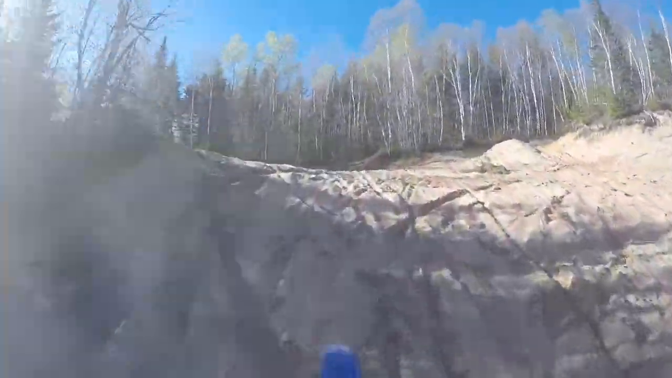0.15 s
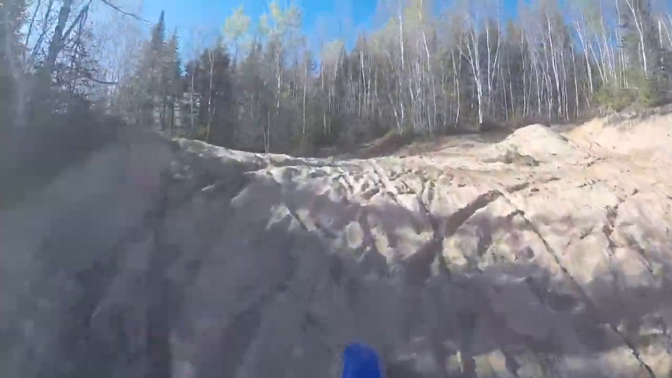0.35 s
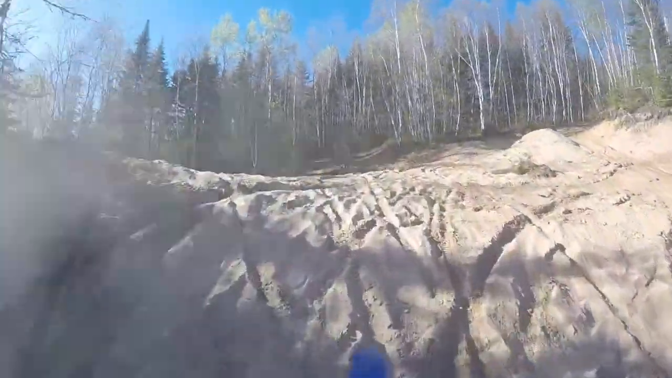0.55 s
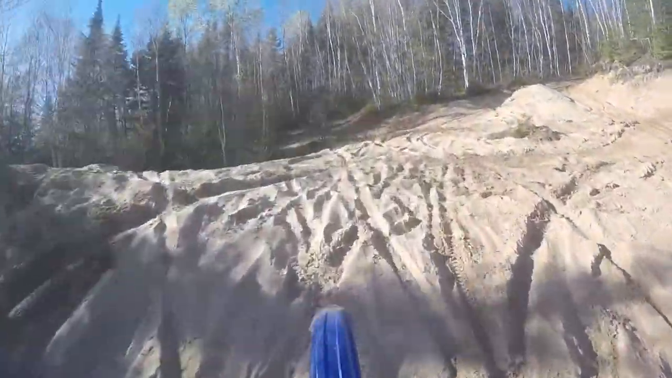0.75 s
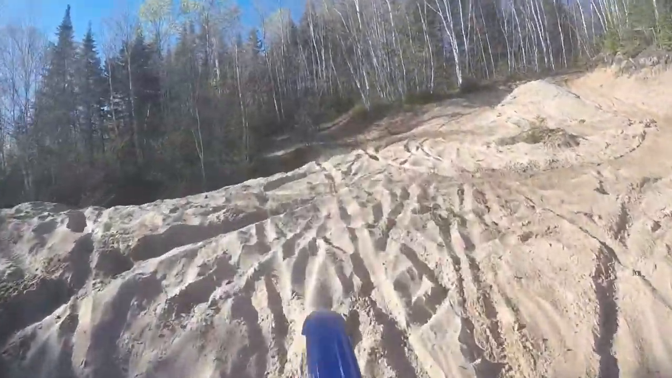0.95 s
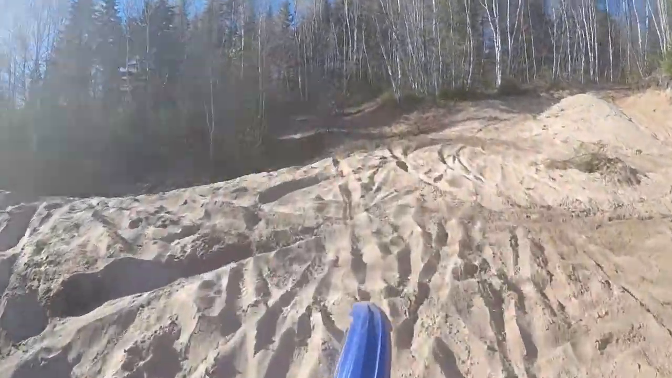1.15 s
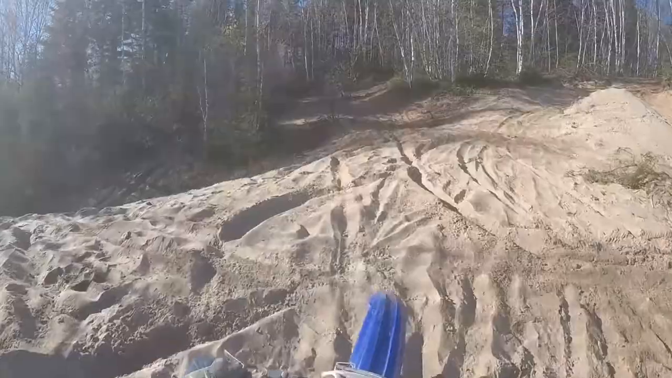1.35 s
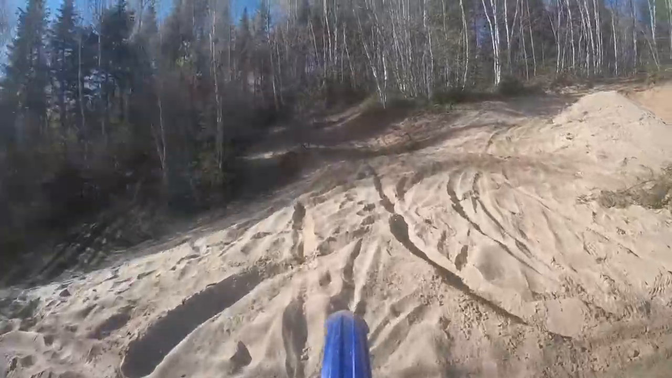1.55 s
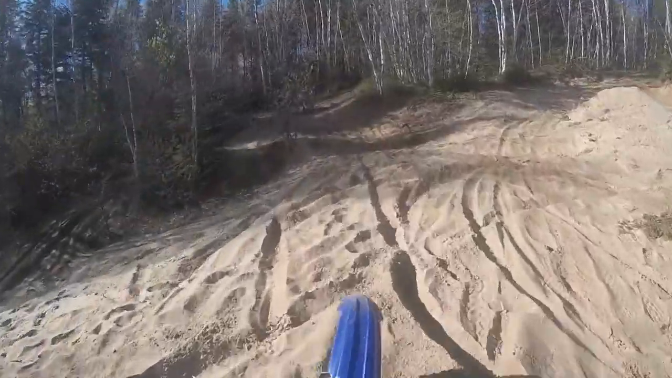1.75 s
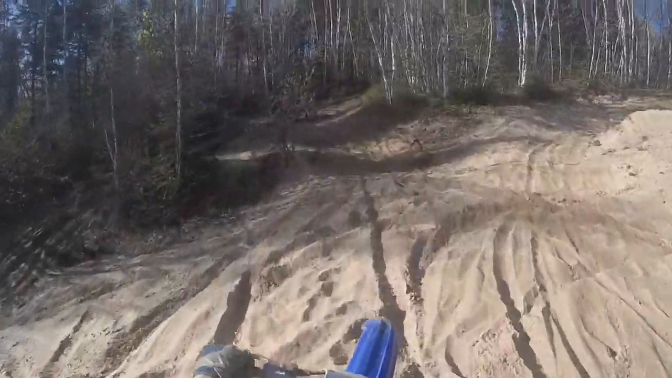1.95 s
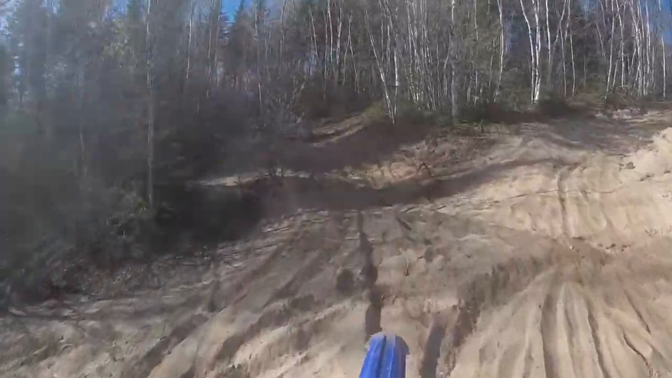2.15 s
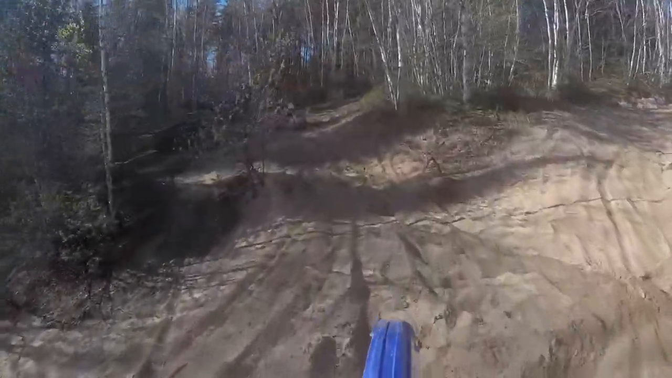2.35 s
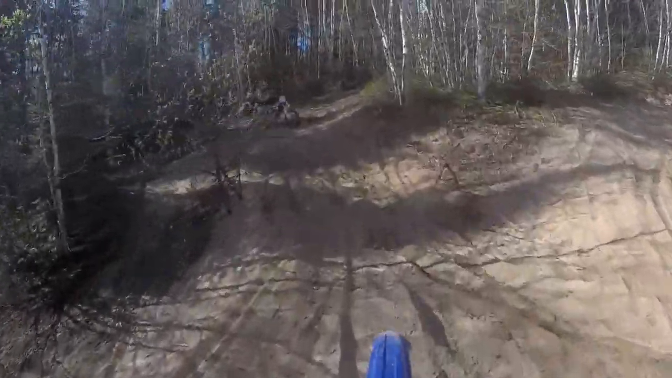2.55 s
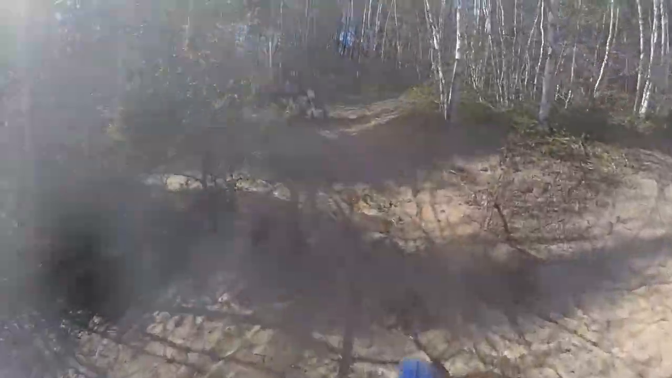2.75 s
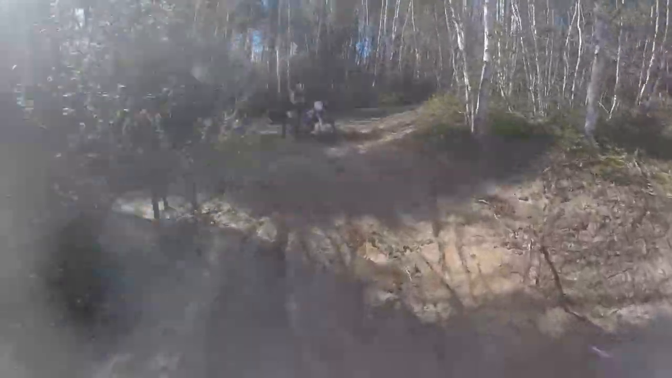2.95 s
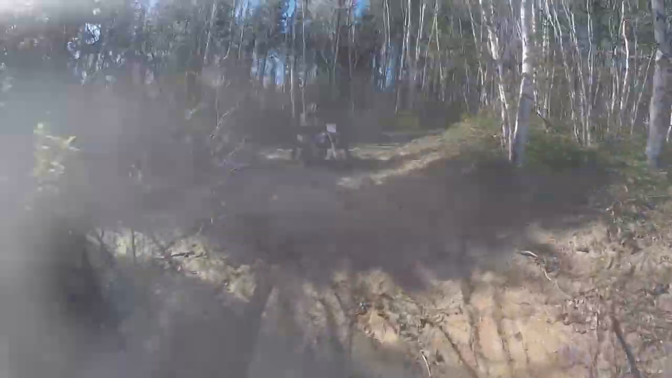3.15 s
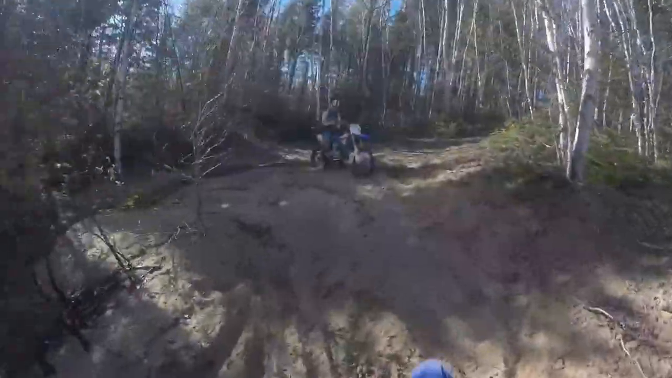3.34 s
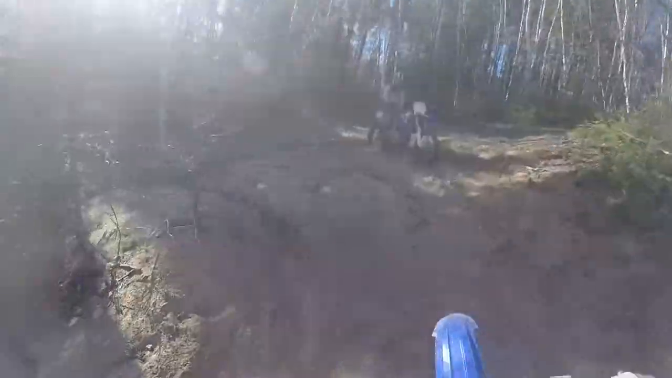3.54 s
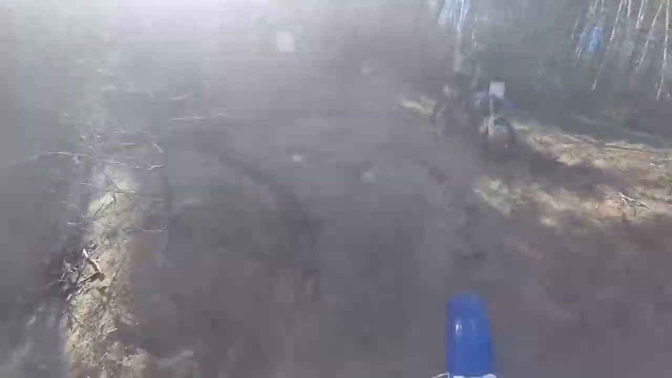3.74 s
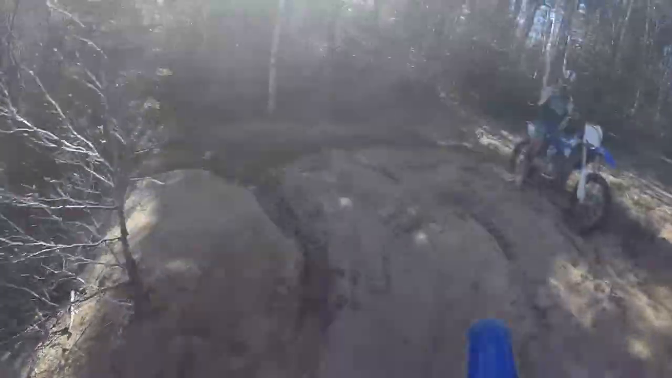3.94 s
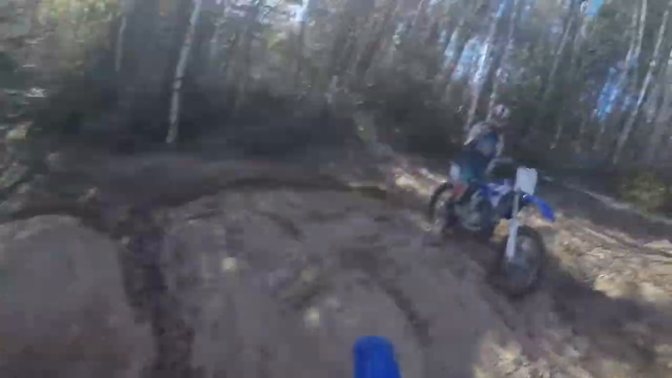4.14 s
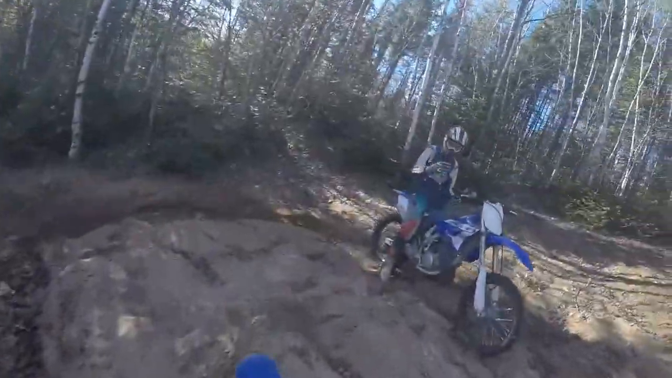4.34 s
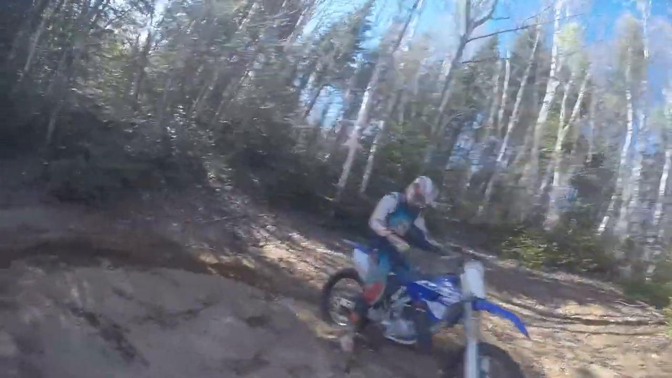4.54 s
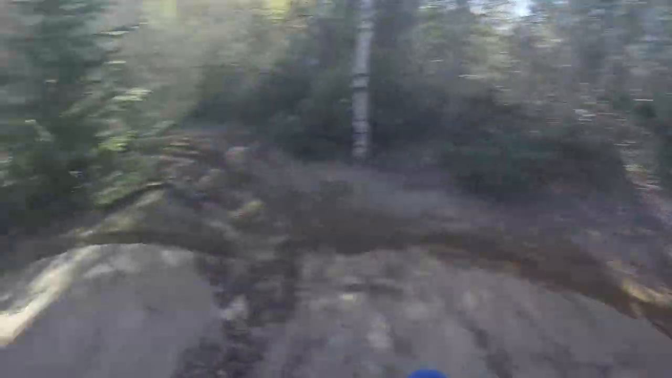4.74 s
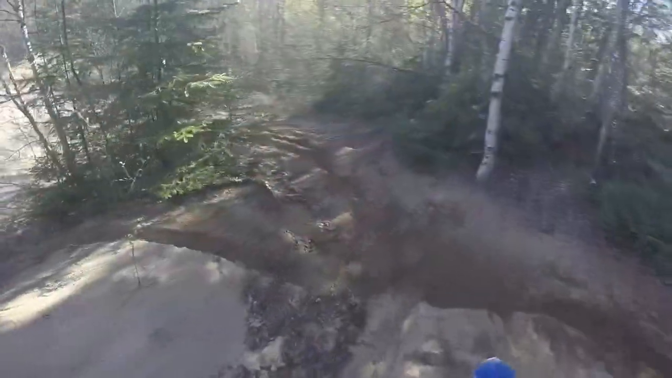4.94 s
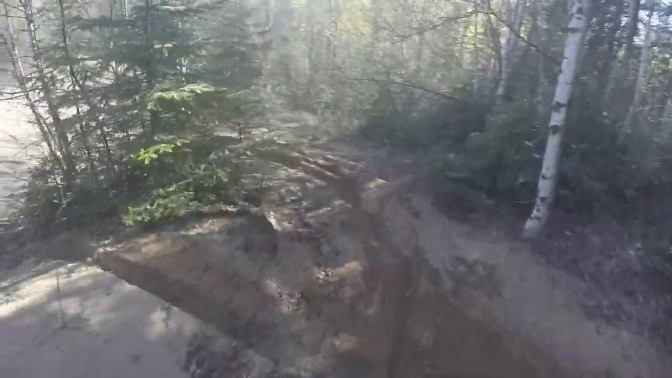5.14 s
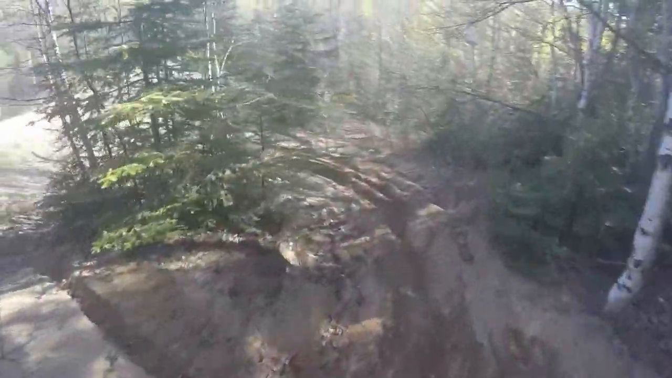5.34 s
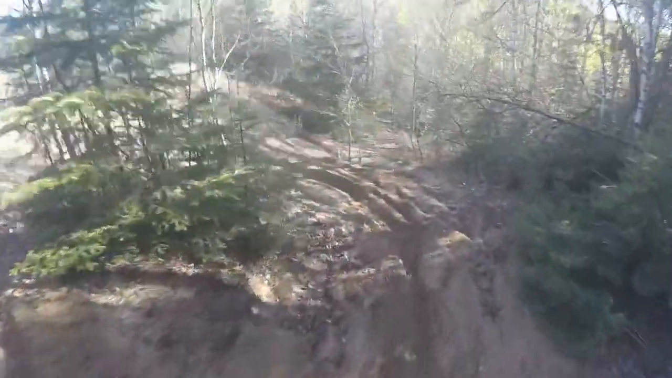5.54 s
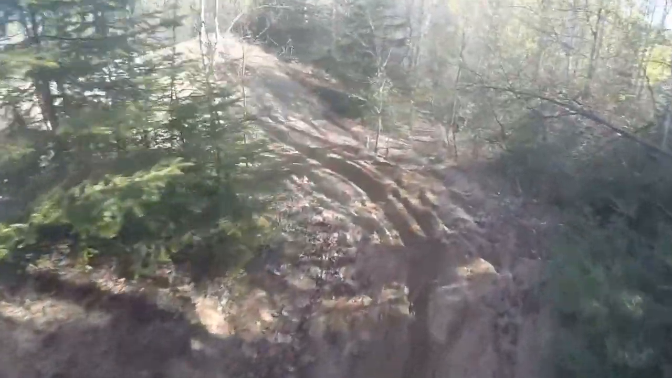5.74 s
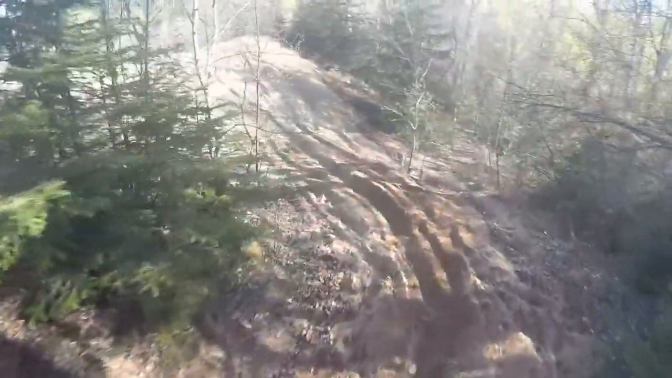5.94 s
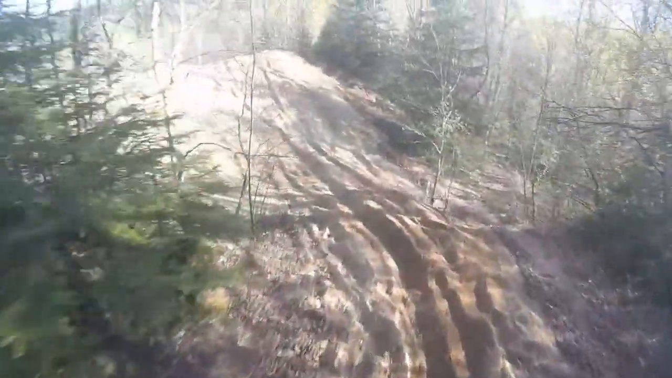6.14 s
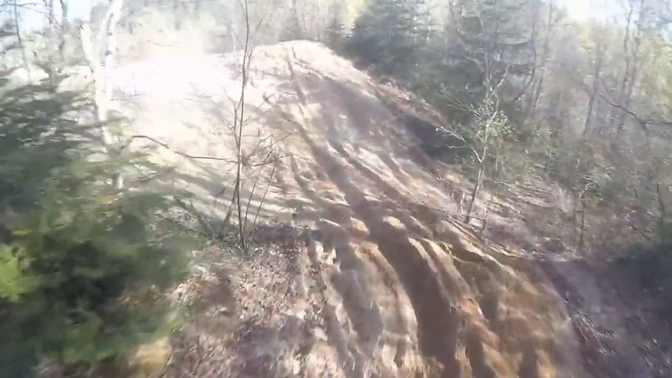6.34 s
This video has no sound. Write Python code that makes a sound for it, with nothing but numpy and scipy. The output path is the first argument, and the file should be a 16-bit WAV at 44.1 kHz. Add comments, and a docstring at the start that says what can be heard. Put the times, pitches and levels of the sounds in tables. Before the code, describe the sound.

Outdoors with the microphone on the bike, a two-stroke engine rips through five back-to-back throttle bursts, each rising in pitch and cutting off briefly. It then falls to a rough, clattering near-idle with small blips, lone pops and wavering gear whine. Sharp chassis knocks and suspension thuds land around the middle, with low wind flutter throughout, and the throttle opens again at the very end.

```python
"""Dirt bike on a sandy hill, from the rider's seat

Open air, microphone on the bike: a two-stroke climbs in five bursts of throttle, then rolls over bumps near idle.
Exhaust pulses and gas noise, once a turn, ring pipe and casing; lone hard firings are noise bursts through them.
A wavering sine at the tooth rate is the gear whine; short noise bursts are chassis knocks and suspension thuds.
Shaped noise gives the buffeting air, the tyre rumble and a faint hiss."""
import sys
import numpy as np
from scipy import signal
from scipy.fft import rfft, irfft, next_fast_len
from scipy.io import wavfile
from scipy.ndimage import uniform_filter1d, map_coordinates

SR = 44100
rng = np.random.default_rng(int(sys.argv[2]) if len(sys.argv) > 2 else 0)


def persist_wave(psi):
    """Save psi, clipped to +-1, as 16-bit WAV."""
    counts = np.round(np.clip(psi, -1, 1) * 32767).astype(np.int16)
    wavfile.write(sys.argv[1], SR, np.atleast_2d(counts).T)


N = 286209
TIME = np.arange(N) / SR
IDLE_HZ = 47.6   # crank turns per second at idle


def from_db(db):
    """Decibels to gain."""
    return 10 ** (np.asarray(db) / 20)


def even(x, size):
    """Hold the running rms near one, over windows of size samples."""
    power = uniform_filter1d(uniform_filter1d(x * x, size), size)
    return x / np.sqrt(np.maximum(power, 1e-12))


def drift(rate):
    """Slow chance, about one in spread: straight lines between rate random values per second."""
    steps = rng.standard_normal(8192)
    return np.interp(TIME * rate, np.arange(len(steps)), steps)


def body(x, spectrum, modes=()):
    """Ring x through a causal body of unit power gain, given its spectrum and its sharp modes."""
    size = 2 * next_fast_len(N // 2 + SR // 4)
    hz = np.maximum(np.arange(size // 2 + 1) * SR / size, 1)
    points = np.array(spectrum)
    db = np.interp(np.log(hz), np.log(points[:, 0]), points[:, 1])
    # beyond both ends of the table the response falls away
    beyond = np.maximum(hz / points[-1, 0], 1) * np.maximum(points[0, 0] / hz, 1)
    db = db - 20 * np.log(beyond)
    for centre, width, lift in modes:
        db = db + lift / (1 + (2 * (hz - centre) / width) ** 2)
    gain = from_db(db) / np.sqrt(np.mean(from_db(db) ** 2))
    cepstrum = irfft(np.log(gain))[:size // 2]
    cepstrum[1:] *= 2   # minimum phase: nothing sounds before its cause
    response = np.exp(rfft(cepstrum, size))
    return irfft(rfft(x, size) * response)[:N]


def bursts(times, levels_db, rise, decay):
    """Envelopes that swell quickly and die away, one for each event; rise and decay in seconds."""
    out = np.zeros(N)
    for s, db in zip(times, levels_db):
        age = np.maximum(TIME - s, 0)
        out += from_db(db) * (1 - np.exp(-age / rise)) * np.exp(-np.minimum(age / decay, 20))
    return out


# crankshaft speed through each of the five pulls up the hill: [t/s, f/Hz in turns per second]
CLIMB_TURNS = [
    [(0.0, 91), (0.054, 92.3), (0.108, 97.8), (0.238, 101.5), (0.374, 133.5), (0.43, 136), (0.46, 139),
     (0.498, 120), (0.52, 108)],
    [(0.54, 106), (0.594, 111), (0.668, 114.6), (0.714, 121), (0.8, 130), (0.834, 130), (0.878, 114),
     (0.932, 97.5), (0.96, 102)],
    [(0.98, 90.4), (1.034, 89.0), (1.086, 90), (1.266, 109.4), (1.354, 129), (1.392, 121), (1.47, 102),
     (1.492, 92), (1.51, 96)],
    [(1.53, 89.8), (1.604, 94), (1.698, 102), (1.766, 102), (1.828, 111.4), (1.914, 119.5), (1.94, 110),
     (1.996, 93.4), (2.01, 94)],
    [(2.03, 87), (2.066, 90.2), (2.15, 100.5), (2.188, 104.6), (2.232, 108), (2.29, 124.4), (2.326, 119),
     (2.386, 116), (2.44, 102)],
]
# crankshaft speed while rolling over the bumps: [t/s, f/Hz in turns per second]
ROLL_TURNS = [(2.5, 84.4), (2.65, 51), (3.04, 45.2), (3.21, 57.5), (3.42, 60.5), (3.55, 50.7), (3.78, 43.3),
              (3.88, 63.4), (3.99, 51), (4.07, 48), (4.2, 45), (4.44, 47.7), (4.56, 54), (4.69, 52),
              (4.81, 46.7), (4.94, 50.3), (5.1, 47.4), (5.52, 45), (5.66, 51.5), (5.73, 50.7), (5.92, 48),
              (6.2, 43.4), (6.39, 49.5), (6.49, 70)]


def crank_speed():
    """Revolutions per second at every sample, in straight lines between the table's points."""
    s, turns_per_s = np.vstack([*CLIMB_TURNS, ROLL_TURNS]).T
    lead_s = .006   # the crank runs ahead of the ringing that it causes
    return np.interp(TIME + lead_s, s, turns_per_s)


def twist(opens, shuts, rise_s, release_s):
    """One twist of the throttle: attack, hold and a round-shouldered release, from 0 to 1."""
    rise = 1 - np.exp(-np.maximum(TIME - opens, 0) / rise_s)
    return rise / (1 + (np.maximum(TIME - shuts, 0) / release_s) ** 3)


# twists of the throttle: [opens t/s, shuts t/s, relative drive level/dB, base rise time/s,
#                          relative gear whine level/dB]
TWISTS = [(-0.05, .425, 0, .003, -8), (.528, .848, .7, .003, -4), (.968, 1.375, 0, .003, -4),
          (1.512, 1.905, .2, .003, -6), (2.015, 2.382, -.2, .005, 4), (3.05, 3.44, -9.3, .08, 3),
          (3.803, 3.905, -10, .025, 2), (4.09, 4.2, -18.5, .025, -8), (4.56, 4.96, -16, .06, 4.5),
          (5.56, 5.7, -26, .04, -15), (6.3, 6.44, -14, .06, -8), (6.41, 6.5, 2.5, .15, -10)]


def drive(attack_s, release_s, early_s=0):
    """How hard the engine is driven: all twists together; a gentle twist also ends gently."""
    return sum(from_db(db) * twist(opens, shuts - early_s, rise_s + attack_s, release_s + .4 * rise_s)
               for opens, shuts, db, rise_s, _ in TWISTS)


def loudness(law, speed, revs):
    """A voice's gain: a part that follows the throttle, joined in power to one that follows speed alone."""
    full_db, revs_db, power, attack_s, release_s, early_s, idle_db, octave_db = law
    fired = from_db(full_db + revs_db * revs) * drive(attack_s, release_s, early_s) ** power
    shut = from_db(idle_db + octave_db * np.log2(speed / IDLE_HZ))
    return np.hypot(fired, shut)


def blowdown(speed, uneven_db, jitter_s, rough, jet_turns):
    """Once a turn the exhaust port opens: a pressure pulse, then a fading jet of turbulent gas."""
    turns = np.cumsum(speed) / SR
    opens = np.interp(np.arange(int(turns[-1]) + 1), turns, np.arange(N))
    chance = rng.standard_normal((1024, 2))[:len(opens)]
    strength = from_db(uneven_db * chance[:, 0])
    at = np.clip(opens + jitter_s * SR * chance[:, 1], 0, N - 1).astype(int)
    pulses = np.zeros(N)
    pulses[at] = strength * np.sqrt(SR / speed[at])   # about equal power at any speed
    jet = np.exp(-(turns % 1) / jet_turns) * strength[turns.astype(int)]
    return pulses + rough * jet / np.sqrt(np.mean(jet ** 2)) * rng.standard_normal(N)


def scatter(x, spread_s):
    """Waves linger in the pipe's walls: each pitch arrives after its own delay, its strength unchanged."""
    size = 2 * next_fast_len(N // 2 + SR // 4)
    hz = np.arange(size // 2 + 1) * SR / size
    marks = np.linspace(0, SR / 2, num=256)
    delay = np.interp(hz, marks, spread_s * rng.exponential(1, len(marks)))
    phase = 2 * np.pi * np.cumsum(delay) * SR / size
    return irfft(rfft(x, size) * np.exp(-1j * phase))[:N]


# exhaust note at speed: [f/Hz, relative level/dB]
EXHAUST_BOOM = [(40, -90), (90, -5.5), (135, -5), (160, -11), (190, 1.5), (275, 8.5), (330, 8.5), (380, -8),
                (480, 0), (530, -3), (575, -15), (660, -9.5), (760, -27), (1100, -113.5)]
# exhaust note on the overrun: [f/Hz, relative level/dB]
EXHAUST_OVERRUN = [(50, -10), (100, -13.5), (150, -10), (200, -1), (245, 5), (300, 2.5), (365, -3.5),
                   (425, 5), (490, -3), (570, -20), (680, -35), (1100, -45)]
# expansion chamber: [f/Hz, relative level/dB]
CHAMBER = [(400, -50), (720, -25), (850, -5), (980, 3), (1140, -6), (1270, -6), (1400, 1), (1520, 3),
           (1700, -7), (2000, -17), (3000, -45)]
# engine casing near idle: [f/Hz, relative level/dB]
ENGINE_CASING = [(400, -2.5), (690, -10.5), (850, 1.5), (985, 7.5), (1130, -6), (1300, -8), (1550, 1),
                 (1850, -6), (2100, -7), (3000, -31.5)]
# thin steel of the pipe: [f/Hz, relative level/dB]
PIPE_STEEL = [(500, -11.5), (1400, 1.5), (1800, 0.5), (2120, -6), (2500, -0.5), (3100, -6.5), (3500, -9.5),
              (4400, -8.5), (5100, -18), (5600, -18.5), (6400, -8), (7700, -18), (9400, -29),
              (10600, -24.5), (15000, -39.5)]
# sharp modes of that steel: [f/Hz, width/Hz, lift/dB]
PIPE_MODES = [(2330, 91, 14.5), (2663, 41, 8), (2713, 27, -9), (2970, 75, 5), (3170, 40, 3), (3210, 32, 13),
              (3733, 76, 9), (3920, 40, 5), (4276, 33.6, 10.5), (4480, 52, 3.5), (5083, 33, 11.5),
              (6650, 107, -16), (6850, 53, 7.5), (8200, 190, 4)]
# voices of the engine, one row each: [level/dB at full drive, change/dB at high revs, power of the drive,
#   attack/s and release/s (gentle twists lengthen both), fades early by/s,
#   level/dB at idle with the throttle shut, rise/dB per octave of speed]
LOW_VOICE = (-20, 1.2, 0.73, 0.03, 0.01, 0.0544, -41.5, 10)
MIDDLE_VOICE = (-17.6, -8, 1.22, .012, .036, .008, -41.5, 12)
RASP_VOICE = (-20.5, 3.5, 1, 0.016, 0.0464, 0, -46.2, 13.5)
SIZZLE_VOICE = (-19, 2, 1.54, 0.0057, 0.0345, 0, -50.5, 13.5)
PIPE_SETS_IN_HZ, PIPE_SPAN_HZ = 62.6, 22   # the crank speeds over which the tuned pipe takes over
HIGH_REVS_HZ, HIGH_REVS_SPAN_HZ = 105.5, 23   # crank speed where the high revs begin, and their range
SIZZLE_EDGE_HZ = 4730   # the pipe's rasp lies below, its sizzle above


def engine(speed):
    """At speed the turns fire cleanly through the pipe; when slow, pulses soften and the casing clatters."""
    load = np.clip((speed - PIPE_SETS_IN_HZ) / PIPE_SPAN_HZ, 0, 1)
    loaded, idle = np.sqrt(load), np.sqrt(1 - load)
    throttle = load * np.clip(drive(attack_s=0.0095, release_s=0.074), 0, 1)
    # the gas flow roughens as the revs rise
    revs = np.clip((speed - HIGH_REVS_HZ) / HIGH_REVS_SPAN_HZ, 0, 1)
    crack_rough, shock_rough = .18 + .45 * revs, .4 + .3 * revs + 1.3 * idle
    slugs = blowdown(speed, uneven_db=.5, jitter_s=.00003, rough=.13, jet_turns=.6)
    puffs = blowdown(speed, uneven_db=.8, jitter_s=.00005, rough=.36, jet_turns=1.5)
    cracks = blowdown(speed, uneven_db=1.1, jitter_s=.00002, rough=crack_rough, jet_turns=.7)
    shocks = blowdown(speed, uneven_db=1.9, jitter_s=.000018, rough=shock_rough, jet_turns=1.4)
    clatter = blowdown(speed, uneven_db=1.5, jitter_s=.00005, rough=.5 + 1.6 * idle, jet_turns=2.5)

    boom = even(body(slugs, EXHAUST_BOOM), size=1600)
    overrun = even(body(scatter(puffs, spread_s=0.01149), EXHAUST_OVERRUN), size=2600)
    bark = even(body(scatter(cracks, spread_s=.0026), CHAMBER), size=1600)
    casing = even(body(scatter(clatter, spread_s=0.003996), ENGINE_CASING), size=2600)
    steel = even(body(scatter(shocks, spread_s=.006), PIPE_STEEL, PIPE_MODES), size=2000)
    below = signal.butter(5, SIZZLE_EDGE_HZ, "low", fs=SR, output="sos")
    above = signal.butter(5, SIZZLE_EDGE_HZ, "high", fs=SR, output="sos")
    rasp, sizzle = signal.sosfilt(below, steel), signal.sosfilt(above, steel)

    low = loaded * boom + idle * overrun
    # the chamber only barks while the throttle is open
    middle = np.sqrt(throttle) * bark + np.sqrt(1 - throttle) * casing
    voices = (low, LOW_VOICE), (middle, MIDDLE_VOICE), (rasp, RASP_VOICE), (sizzle, SIZZLE_VOICE)
    return sum(voice * loudness(law, speed, revs) for voice, law in voices)


def reflections(x):
    """Ground and rider's body echo the treble close by; the paths shift as the bike pitches, by slow chance."""
    treble = signal.sosfilt(signal.butter(2, 1900, "high", fs=SR, output="sos"), x)
    out = x
    for delay_s in (.0011, .0023, .0037):
        lag = delay_s + .00009 * drift(11)
        out = out + .33 * map_coordinates(treble, [np.arange(N) - lag * SR], order=3)
    return out


# how strongly the casing radiates the gear whine: [f/Hz, relative level/dB]
WHINE_RADIATION = [(880, -45), (975, -42), (1035, -38), (1130, -42.5), (1300, -44), (1520, -23),
                   (1750, -33), (1980, -47), (2340, -32), (2900, -34)]
GEAR_TEETH = 21
LASH_DB, LASH_DELAY_S, LASH_WIDTH_S = 4, 0.07, 0.038   # the whine swells just after the throttle shuts
WHINE_COASTING_DB = -5.5   # relative level with the throttle shut
WHINE_WOBBLE = 0.02366   # share of the pitch at idle, growing with speed


def gears(speed):
    """The crank gear's teeth mesh in a rough, wavering note: louder under drive, swelling as it lets go."""
    hz = GEAR_TEETH * speed
    mesh = from_db(WHINE_COASTING_DB)
    for opens, shuts, _, rise_s, whine_db in TWISTS:
        lash = from_db(LASH_DB) * np.exp(-((TIME - shuts - LASH_DELAY_S) / LASH_WIDTH_S) ** 2)
        mesh = mesh + from_db(whine_db) * (twist(opens, shuts, rise_s, release_s=0.031) + lash)
    wobble = 1 + WHINE_WOBBLE * speed / IDLE_HZ * drift(400)
    db = np.interp(hz, *np.transpose(WHINE_RADIATION)) + 3.1 * drift(80)
    tone = np.sin(2 * np.pi * np.cumsum(hz * wobble) / SR)
    return mesh * from_db(db) * tone


# air on the microphone through the ride: [t/s, relative level/dB]
AIR_LEVEL = [(0.0, -31), (0.03, -21), (1.53, -27), (1.57, -21), (2.31, -26.5), (2.37, -11.5), (2.56, -27),
             (3.09, -26), (3.61, -15.5), (3.63, -9.5), (3.99, -25.5), (4.41, -16.5), (4.54, -35),
             (5.01, -19.5), (5.51, -24), (5.82, -14.5), (6.18, -23), (6.49, -19)]
# colour of the air on the microphone: [f/Hz, relative level/dB]
AIR_COLOUR = [(10, -41.5), (21, -2.5), (28.5, 1), (34, -3), (41, -20), (52, -27.5), (66, -49), (100, -48.5),
              (200, -60), (800, -71)]
# colour of suspension and tyres: [f/Hz, relative level/dB]
SUSPENSION = [(20, -21), (40, 2), (70, -10), (120, -16.5), (170, -36), (300, -29), (900, -45)]
HISS_DB = -68   # faint steady hiss at the microphone


def wind():
    """Air and shaking make a deep, lumpy flutter over a faint hiss and the low rumble of the tyres."""
    db = np.interp(TIME, *np.transpose(AIR_LEVEL))
    lumps_db = 2.3 * drift(14)
    air = even(body(rng.standard_normal(N), AIR_COLOUR), size=2400)
    flutter = from_db(db + lumps_db + 0.37) * air
    hiss = from_db(HISS_DB) * rng.standard_normal(N)
    tyres = from_db(-46.5) * body(rng.standard_normal(N), SUSPENSION)
    return flutter + hiss + tyres


# lone hard firings as the engine catches or burbles: [t/s, relative crack level/dB, relative boom level/dB]
LONE_FIRINGS = [(0.5345, -17, -23), (1.516, -18.5, -20.5), (3.0068, -28, -25.5), (3.0768, -25.5, -23.5),
                (3.1204, -23.5, -35), (3.8015, -29, -27), (4.0906, -27.5, -27), (4.4584, -28, -26),
                (4.5187, -25.5, -29), (4.577, -25, -31), (4.6329, -22, -25), (4.6684, -23.5, -27),
                (4.7059, -24, -27), (4.745, -26, -29), (5.5337, -25, -27), (5.6161, -25.5, -28),
                (5.695, -29.5, -37), (6.2003, -29.5, -28.5), (6.2886, -31, -28.5), (6.3327, -29, -25.5),
                (6.3739, -24.5, -23)]
# colour of the pipe's steel under a lone firing: [f/Hz, relative level/dB]
FIRING_STEEL = [(500, -28), (1400, 0.5), (2100, -9), (2500, 3), (3250, 0.5), (3550, -2), (4300, -3),
                (5500, -16.5), (6500, -3), (7600, -14.5), (9400, -25.5), (10600, -19.5), (15000, -37)]


def pops():
    """A lone firing sends a gust through the pipe and sets its steel ringing."""
    s, crack_db, boom_db = np.transpose(LONE_FIRINGS)
    gas = rng.standard_normal(N)
    steel = even(body(gas, FIRING_STEEL, PIPE_MODES), size=200)
    ring = steel * bursts(s - .001, crack_db, rise=0.0025, decay=0.021)   # the ring starts 1 ms ahead
    bark = even(body(gas, ENGINE_CASING), size=400) * bursts(s, crack_db, rise=0.00141, decay=0.01)
    boom = even(body(gas, EXHAUST_OVERRUN), size=600) * bursts(s, boom_db, rise=0.0014, decay=0.02)
    return from_db(-4) * ring + from_db(1.5) * bark + from_db(1) * boom


# chassis knocks: [t/s, relative level/dB]
CHASSIS_KNOCKS = [(3.532, -19.5), (3.605, -5), (3.618, -29), (3.677, -27), (3.821, -13.5), (5.843, -17),
                  (5.971, -28), (6.034, -30), (6.371, -22)]
# suspension thuds: [t/s, relative level/dB]
SUSPENSION_THUDS = [(3.527, -27), (3.621, -12), (3.82, -22), (4.235, -29)]
# colour of frame and plastics: [f/Hz, relative level/dB]
FRAME = [(100, -35), (250, 9), (480, -7.5), (820, 9.5), (1150, 5), (1600, -6.5), (2400, 4.5), (3000, -7),
         (3800, -15.5), (4800, -15.5), (6500, -25.5), (11000, -29.5), (15000, -36)]


def bumps():
    """The chassis cracks and rattles briefly; the suspension thuds underneath."""
    s, db = np.transpose(CHASSIS_KNOCKS)
    crack = bursts(s, db, rise=0.00056, decay=0.0019)
    rattle = from_db(-9) * bursts(s, db, rise=0.0011, decay=0.015)
    knocks = body((crack + rattle) * rng.standard_normal(N), FRAME)
    thump = even(body(rng.standard_normal(N), SUSPENSION), size=900)
    thuds = thump * bursts(*np.transpose(SUSPENSION_THUDS), rise=0.0024, decay=0.014)
    return from_db(-2.5) * knocks + from_db(9) * thuds


def scene():
    """Everything rides with the microphone, in the open air."""
    speed = crank_speed()
    return (reflections(engine(speed)) + gears(speed) + wind() + pops() + bumps())[None, :]


def record(dry):
    """The microphone's one channel: the highest peaks are rounded and the top is cut."""
    low_pass = signal.ellip(12, .1, 80, 15350, fs=SR, output="sos")   # ripple dB, stop dB, cutoff Hz
    return signal.sosfilt(low_pass, np.tanh(dry))


dry = scene()
out = record(dry)
persist_wave(out)
```